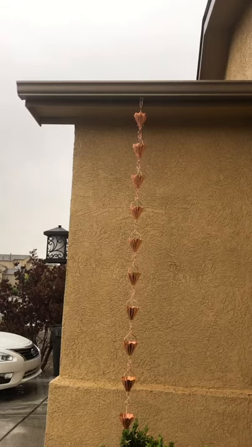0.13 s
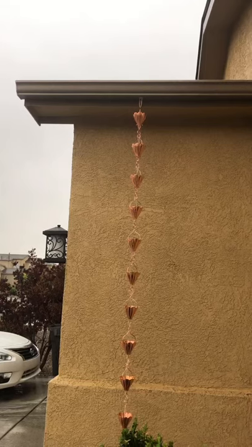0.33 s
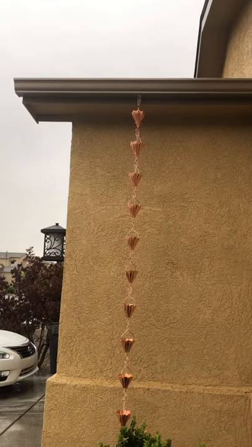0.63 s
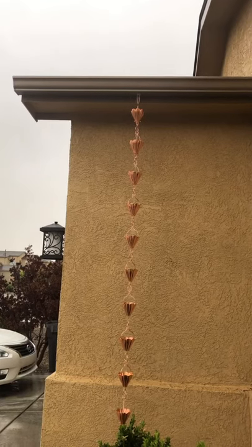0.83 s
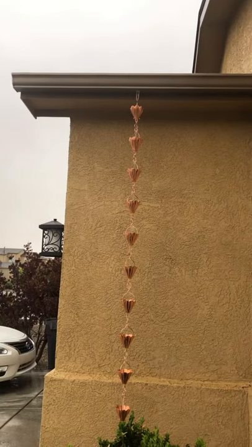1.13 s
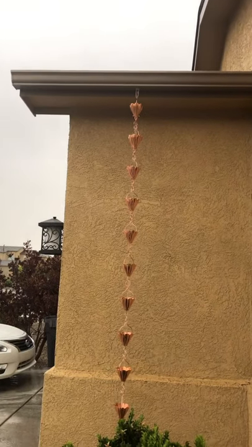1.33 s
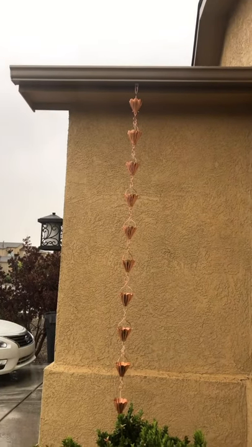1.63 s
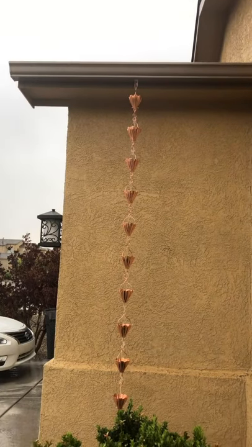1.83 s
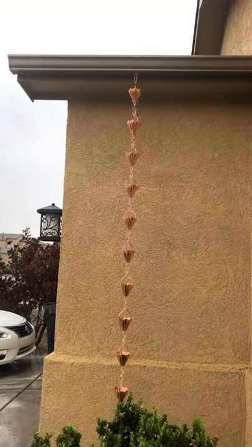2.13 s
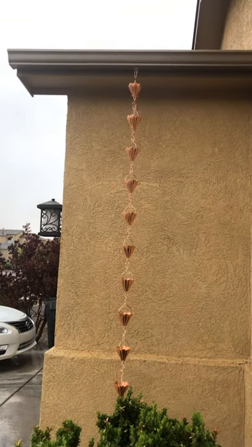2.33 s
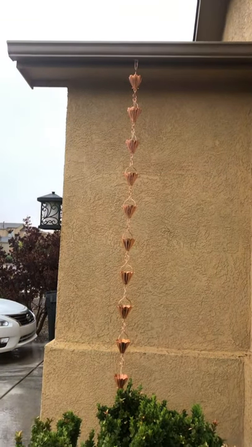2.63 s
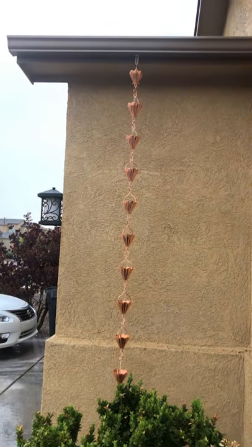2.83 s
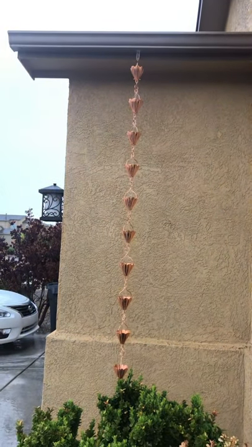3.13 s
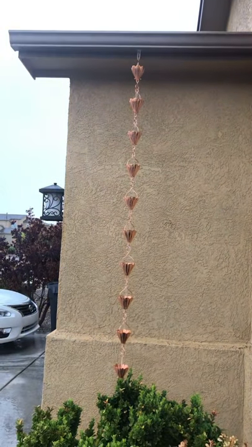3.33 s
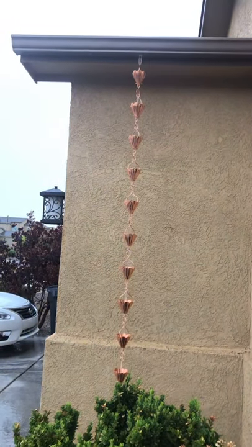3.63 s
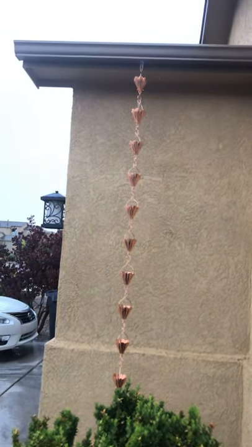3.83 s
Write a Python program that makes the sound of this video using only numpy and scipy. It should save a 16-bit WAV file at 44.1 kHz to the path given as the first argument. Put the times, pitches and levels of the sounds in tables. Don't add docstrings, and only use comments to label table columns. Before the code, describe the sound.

Rain falls evenly on paving, bushes and a copper rain chain; drops snap close by, two thud on the phone, and breeze rumbles increasingly over its microphone, outdoors.

```python
import sys
import numpy as np
from scipy import signal
from scipy.fft import rfft, irfft, next_fast_len
from scipy.io import wavfile
from scipy.ndimage import uniform_filter1d, map_coordinates

SR = 44100
rng = np.random.default_rng(int(sys.argv[2]) if len(sys.argv) > 2 else 0)


def to_wav(s):
    ch = np.atleast_2d(s).T
    pcm = np.round(np.clip(ch, -1, 1) * 32767)
    wavfile.write(sys.argv[1], SR, pcm.astype(np.int16))


def voltage_ratio(level):
    return 10 ** (np.asarray(level, float) / 20)


N = 176400
LAG_S = 0.001


def unit(x):
    return x / np.sqrt(np.mean(x ** 2) + 1e-20)


def by_peak(rows):
    return rows / np.abs(rows).max(axis=1, keepdims=True)


def noise():
    return rng.standard_normal(N)


def curve(rows):
    return np.interp(np.arange(N) / SR, *np.transpose(rows))


def wobble(knots_per_s):
    knots = rng.standard_normal(int(N * knots_per_s / SR) + 4)
    return map_coordinates(knots, [np.arange(N) * knots_per_s / SR])


def coloured(x, points):
    size = next_fast_len(N + SR // 4)
    point_hz, point_db = np.transpose(points)
    hz = np.fft.rfftfreq(size, 1 / SR)
    gain_db = np.interp(np.log(hz + 1), np.log(point_hz + 1), point_db)
    return unit(irfft(rfft(x, size) * voltage_ratio(gain_db), size)[:N])


def patchy(depth_db, slow_db):
    z = signal.stft(noise(), nperseg=256)[2]

    def field(bins, frames):
        tall = uniform_filter1d(rng.standard_normal(z.shape), bins, axis=0)
        return unit(uniform_filter1d(tall, frames, axis=1))

    gain_db = depth_db * field(8, 8) + slow_db * field(24, 50)
    return signal.istft(z * voltage_ratio(gain_db), nperseg=256)[1][:N]


def place(start_s, rows):
    at = np.round(np.asarray(start_s) * SR).astype(int)[:, None] + np.arange(rows.shape[1])
    return np.bincount(at.ravel(), rows.ravel(), N + SR)[:N]


def drop_gain(size, swing_db, floor):
    return voltage_ratio(-swing_db * np.log(size + floor))[:, None]


def grains(per_s, mid_hz, spread, cycles, swing_db, size=384):
    when, pitch, big = rng.random((int(per_s * N / SR), 3)).T
    logistic = np.log(pitch / (1 - pitch) + 1e-9)
    hz = np.clip(mid_hz * np.exp(spread * logistic / 2), 500, SR / 3)[:, None]
    turns = hz * np.arange(size) / SR
    envelope = (1 - np.exp(-8 * turns / cycles)) * np.exp(-turns / cycles)
    rows = drop_gain(big, swing_db, 0.012) * envelope * np.sin(2 * np.pi * turns)
    return unit(place(when * N / SR, rows))


def swoop(t, first_hz, last_hz, fall_s, rise_s):
    turns = last_hz * t + (first_hz - last_hz) * fall_s * (1 - np.exp(-t / fall_s))
    return t / rise_s * np.exp(1 - t / rise_s) * np.sin(2 * np.pi * turns)


def rain():
    # time in seconds, level in dB.
    shower = [(0.05, -52.5), (0.7, -53), (0.93, -53), (3.62, -53), (3.77, -51.5), (4.0, -52.5)]
    # frequency in Hz, density in dB per Hz.
    hiss_spectrum = [(250, -11), (480, -3.5), (1000, -0.5), (2500, -7.5), (6500, -11.5), (9000, -17.5),
                     (12800, -23.5), (15700, -22)]
    hiss = coloured(patchy(depth_db=0.8, slow_db=0.5), hiss_spectrum)
    patter = grains(per_s=2000, mid_hz=5560, spread=0.619, cycles=1.85, swing_db=3.5)
    drips = grains(per_s=360, mid_hz=5000, spread=0.6, cycles=16, swing_db=3.5, size=900)

    splash_per_s, splash_s = 99, 0.0035
    when, size = rng.random((int(splash_per_s * N / SR), 2)).T
    decay = np.exp(-np.arange(2048) / SR / splash_s)
    bursts = place(when * N / SR, drop_gain(size, 4, 0.12) * decay)
    splash = unit(bursts * np.diff(coloured(noise(), hiss_spectrum), prepend=0))

    strength_db = curve(shower) + 1.0 + 0.081 * wobble(4.5) + 0.14 * wobble(4.7)
    return voltage_ratio(strength_db) * (hiss + voltage_ratio(-11) * patter + voltage_ratio(-10) * drips + voltage_ratio(-11.5) * splash)


def street():
    # frequency in Hz, density in dB per Hz.
    wash_spectrum = [(20, -20), (60, -9), (130, -4), (350, -1.5), (600, -7), (1000, -28)]
    return voltage_ratio(-57 + 1.7 * wobble(6.06)) * coloured(patchy(depth_db=-1.5, slow_db=-0.5), wash_spectrum)


def breeze():
    # time in seconds, level in dB.
    gusts = [(0.05, -54.5), (0.61, -47), (0.93, -53), (1.17, -44.5), (1.33, -40), (1.5, -47), (1.57, -44),
             (1.73, -42), (1.92, -71), (2.07, -37), (2.25, -45.5), (2.47, -41.5), (2.61, -61), (2.92, -30),
             (3.06, -45), (3.39, -36.5), (3.56, -44.5), (4.0, -28)]
    # frequency in Hz, density in dB per Hz.
    port_spectrum = [(12, -47), (20, -36), (52, 5.5), (87, 0), (172, -5.5), (393, -27.5), (484, -29),
                     (900, -61), (1170, -72), (1980, -120)]
    # frequency in Hz, density in dB per Hz.
    flutter_spectrum = [(60, -20), (150, 13), (260, 0), (450, -8), (800, -32)]
    # time in seconds, peak in dB, pitch in Hz.
    puffs = [(0.668, -35.5, 95.5), (0.719, -36, 115), (1.161, -40, 76.5), (1.257, -28.5, 110.5),
             (1.297, -38, 100), (1.312, -33, 72.4), (1.43, -35, 72.6), (1.475, -33.5, 87.5),
             (1.507, -37, 128), (1.565, -38, 73.4), (1.639, -25.5, 113), (1.687, -38, 87.5),
             (2.106, -29, 84), (2.208, -34, 71.6), (2.384, -39, 93), (2.509, -28, 87), (2.865, -34.5, 127),
             (2.898, -34, 90), (2.98, -43, 77.5), (3.071, -25, 130), (3.086, -27.5, 73), (3.106, -30.5, 76),
             (3.159, -31.5, 71), (3.23, -28, 88.7), (3.29, -27, 79), (3.372, -28.5, 115.5),
             (3.432, -33.5, 110), (3.485, -29, 80), (3.59, -29.5, 75.6), (3.743, -25.5, 143),
             (3.777, -29.5, 90.5), (3.93, -31, 86)]
    # time in seconds, peak in dB, pitch in Hz.
    ripples = [(0.056, -44.5, 100), (0.474, -46.5, 75), (1.045, -44.5, 71.5), (1.341, -42, 75.0),
               (1.61, -37, 135.0), (1.703, -44, 78.6), (1.725, -54, 85.5), (2.091, -37.0, 126),
               (2.156, -45, 78.5), (2.24, -46, 85.0), (2.259, -40, 69.0), (2.297, -39.5, 102.0),
               (2.333, -41, 86.0), (2.36, -39, 90.0), (2.435, -41.5, 106.0), (2.477, -42, 107),
               (2.537, -37, 84.5), (2.585, -40.0, 82.5), (2.637, -41, 78), (2.673, -39.0, 86),
               (2.698, -42, 86), (2.721, -44, 85.4), (2.8, -39.5, 99.0), (2.934, -36.5, 86),
               (2.953, -45, 72.4), (3.005, -39.0, 73.0), (3.193, -36, 110.0), (3.326, -36.0, 119),
               (3.354, -39, 98.0), (3.523, -32.5, 120.0), (3.563, -29.5, 108), (3.628, -43, 92.0),
               (3.674, -39.0, 94), (3.71, -34, 98), (3.757, -36, 141), (3.824, -41, 85.0),
               (3.849, -35, 114), (3.872, -34.5, 110), (3.908, -34, 98), (3.964, -26.5, 94)]
    lumps = voltage_ratio(3.5 * wobble(27) + 1.4 * wobble(16))
    buffet = voltage_ratio(curve(gusts) - 5) * unit(lumps * coloured(noise(), port_spectrum))

    s, db, hz = np.transpose(puffs + ripples)[:, :, None]
    start_s = s[:, 0] + 0.0029
    t = np.arange(SR // 8) / SR

    def burst(rise_cycles):
        u = t * hz / rise_cycles
        return place(start_s, voltage_ratio(db) * u * np.exp(1 - u))

    push = swoop(t, 2.037 * hz, 0.894 * hz, fall_s=0.51 / hz, rise_s=0.82 / hz)
    eddies = place(start_s, voltage_ratio(db - 2) * push)
    churn = voltage_ratio(-17) * burst(1.76) * coloured(noise(), port_spectrum)
    flutter = voltage_ratio(-18) * burst(0.98) * coloured(noise(), flutter_spectrum)
    return buffet + churn + flutter + eddies


def ticks():
    # time in seconds, peak in dB, pitch in Hz.
    near_drops = [(0.0497, -40.5, 5600), (0.133, -38.5, 4000), (0.1406, -37.5, 8000), (0.267, -44, 6000),
                  (0.2787, -50, 5160), (0.7088, -47, 3870), (0.7542, -38, 6260), (0.9802, -48, 6150),
                  (1.2406, -41, 5560), (1.4233, -35, 3600), (1.4548, -40.5, 3900), (1.8193, -40.5, 7560),
                  (1.8847, -47, 5040), (2.0625, -51, 3980), (2.215, -48, 3600), (2.259, -39.5, 5230),
                  (2.2944, -51, 6000), (2.3896, -41, 5280), (2.46, -43, 3070), (2.519, -37, 3880),
                  (3.076, -42, 4500), (3.114, -42, 5170), (3.524, -42.5, 5270), (3.6404, -44, 2740)]
    cycles, spray_s, spray_width = 2.2, 0.017, 0.35
    s, db, hz = np.transpose(near_drops)[:, :, None]
    t = np.arange(1024) / SR
    f = np.fft.rfftfreq(len(t), 1 / SR) + 1
    band = np.exp(-(np.log(f / hz) / spray_width) ** 2 / 2)
    spray = irfft(rfft(rng.standard_normal((len(s), len(t)))) * band)
    spray = spray / spray.std(axis=1, keepdims=True)
    snap = np.exp(-t * hz / cycles) * (np.sin(2 * np.pi * hz * t) + 0.77 * spray)
    tail = voltage_ratio(-12) * np.exp(-t / spray_s) * spray
    return place(s[:, 0] + LAG_S, voltage_ratio(db + 1) * by_peak(snap + tail))


def snaps():
    # time in seconds, peak in dB.
    bursts = [(0.1085, -37), (0.2523, -46), (0.2795, -35.5), (0.3925, -42), (0.5332, -39.5), (0.6868, -41),
              (0.8236, -47), (0.838, -51), (0.8765, -48), (0.8794, -35), (0.9805, -42), (1.1189, -56),
              (1.8198, -54), (2.022, -43), (2.3344, -42), (2.6174, -59), (2.8994, -49), (3.0081, -49),
              (3.016, -54), (1.357, -52), (1.434, -49), (2.2592, -52), (2.538, -53), (2.829, -48),
              (2.852, -50), (3.56, -53), (3.66, -53), (3.79, -54), (3.1393, -40), (3.2874, -54),
              (3.3488, -55), (3.4166, -43), (3.911, -41.5)]
    # frequency in Hz, density in dB per Hz.
    snap_spectrum = [(1500, -49), (4500, -13.5), (9000, -13), (12500, -15), (15500, -13), (20000, 7)]
    snap_s, tail_s = 0.00056, 0.017
    s, db = np.transpose(bursts)[:, :, None]
    t = np.arange(1024) / SR
    fizz = coloured(noise(), snap_spectrum)[:len(s) * len(t)].reshape(len(s), -1)
    decay = np.exp(-t / snap_s) + voltage_ratio(-15.5) * np.exp(-t / tail_s)
    return place(s[:, 0] + LAG_S, voltage_ratio(db + 14.0) * by_peak(fizz * decay))


def thuds():
    # time in seconds, peak in dB, first pitch in Hz, last pitch in Hz.
    case_drops = [
        (0.8797, -26.5, 970, 117),
        (3.0567, -24.5, 1290, 243),
    ]
    s, db, first_hz, last_hz = np.transpose(case_drops)[:, :, None]
    push = swoop(np.arange(2048) / SR, first_hz, last_hz, fall_s=0.0021, rise_s=0.0021)
    return place(s[:, 0], voltage_ratio(db) * push)


def cracks():
    # time in seconds, peak in dB, pitch in Hz.
    hard_snaps = [
        (.8806, -26, 5600),
        (.8807, -30, 14800),
        (3.1404, -30, 6200),
        (3.1401, -32.5, 9500),
        (3.1403, -31.5, 14000),
    ]
    s, db, hz = np.transpose(hard_snaps)[:, :, None]
    turns = hz * np.arange(128) / SR
    return place(s[:, 0], voltage_ratio(db) * by_peak(np.exp(-turns / 1.6) * np.sin(2 * np.pi * turns)))


def flicks():
    # time in seconds, peak in dB.
    fronts = [(1.262, -34), (1.317, -33), (1.469, -39), (1.508, -43.5), (1.61, -37), (1.644, -30),
              (1.715, -42.5), (2.099, -36.5), (2.113, -33.5), (2.126, -39), (2.379, -44), (2.906, -38),
              (3.11, -42), (3.141, -37), (3.164, -42.5), (3.182, -36), (3.23, -37.5), (3.249, -40.5),
              (3.284, -38.5), (3.304, -32), (3.32, -37), (3.371, -33), (3.489, -36.5), (3.524, -39.5),
              (3.584, -39), (3.756, -43), (3.775, -37.5), (3.827, -45), (3.9, -36), (3.912, -41),
              (3.925, -35.5), (3.947, -34.5), (3.974, -35)]
    s, db = np.transpose(fronts)[:, :, None]
    push = swoop(np.arange(2048) / SR, first_hz=491, last_hz=170.4, fall_s=0.00355, rise_s=0.0043)
    return place(s[:, 0], voltage_ratio(db) * push)


def cups():
    # time in seconds, peak in dB, cup note in Hz, splash length in seconds.
    plinks = [(1.356, -50, 4000, .003), (1.374, -47, 3500, .004), (1.54, -49, 2900, .005),
              (1.6485, -40, 2600, .006), (1.649, -38, 3700, .002), (1.65, -45, 3250, .004),
              (1.656, -42, 2820, .012), (1.657, -46, 3700, .012), (1.65, -50, 1100, .015),
              (1.672, -47, 2600, .008), (1.685, -49, 3400, .03), (2.354, -47, 3700, .005),
              (2.4865, -42, 4100, .002), (2.487, -43, 3400, .004), (2.495, -46, 3600, .007),
              (2.49, -45, 1100, .011), (2.594, -43.5, 3700, .004), (3.728, -45, 1200, .005),
              (3.754, -41, 2600, .006), (3.763, -42, 2800, .01), (3.78, -47, 2700, .015),
              (3.77, -48, 3700, .012)]
    s, db, hz, length_s = np.transpose(plinks)[:, :, None]
    t = np.arange(8192) / SR
    f = np.fft.rfftfreq(len(t), 1 / SR)
    hit = rng.random((len(s), len(t))) < 0.015
    strikes = rng.standard_normal(hit.shape) * (0.12 + hit)
    width_hz = 0.13 * hz
    resonance = 1j * f * width_hz / (hz ** 2 - f ** 2 + 1j * f * width_hz)
    ring = irfft(rfft(strikes) * resonance ** 2)
    shape = (1 - np.exp(-t / 0.00029)) * np.exp(-(t / length_s) ** 1.4 / 2)
    return place(s[:, 0], voltage_ratio(db) * by_peak(shape * ring))


def scene():
    weather = rain() + street() + breeze() + flicks()
    drops = ticks() + snaps() + thuds() + cracks() + cups()
    return (weather + drops)[None]


def roll_off(x):
    return signal.sosfilt(signal.butter(12, 17070, fs=SR, output="sos"), x)


def record(dry):
    top_hz, start_s, fade_s = 15870, 0.035, 0.0015
    limited = irfft(rfft(dry) * (np.fft.rfftfreq(N, 1 / SR) < top_hz), N)
    opening = np.clip((np.arange(N) / SR - start_s) / fade_s, 0, 1)
    return roll_off(limited * opening)


dry = scene()
out = record(dry)
to_wav(out)
```